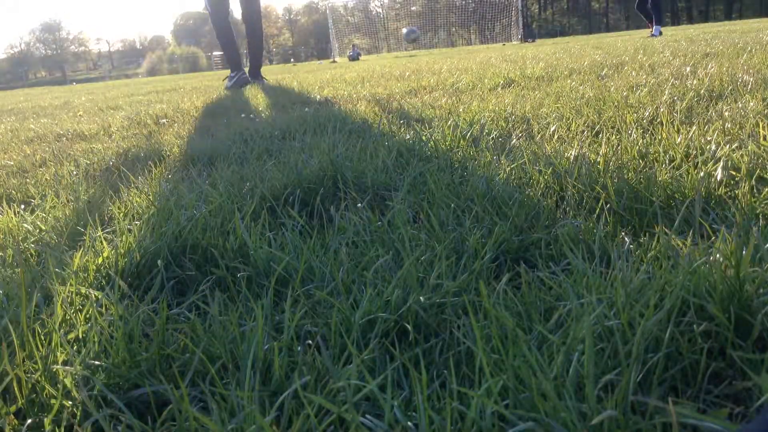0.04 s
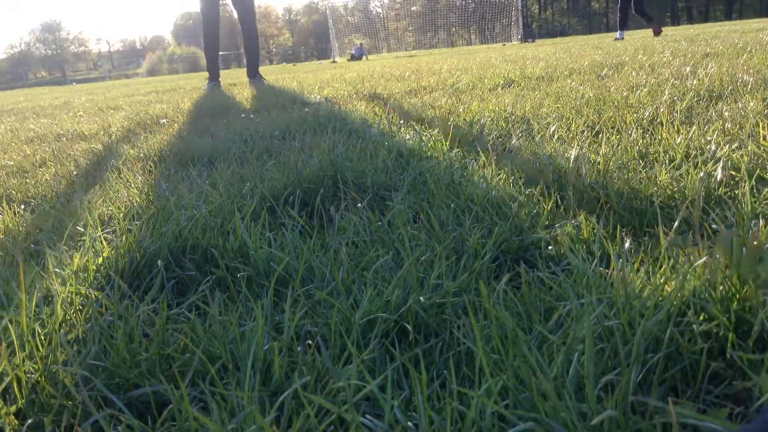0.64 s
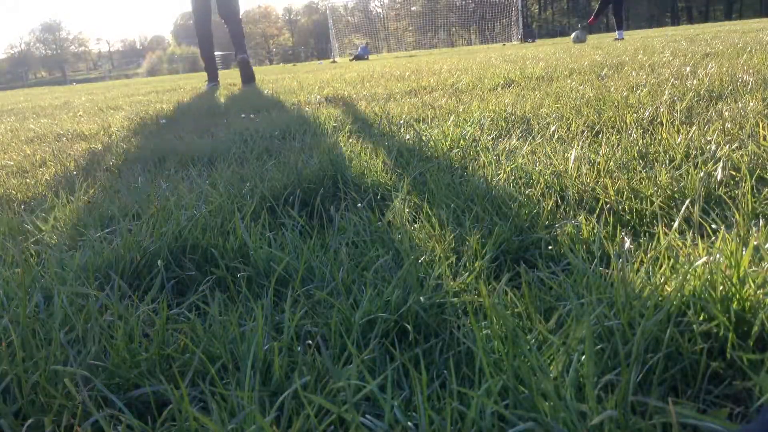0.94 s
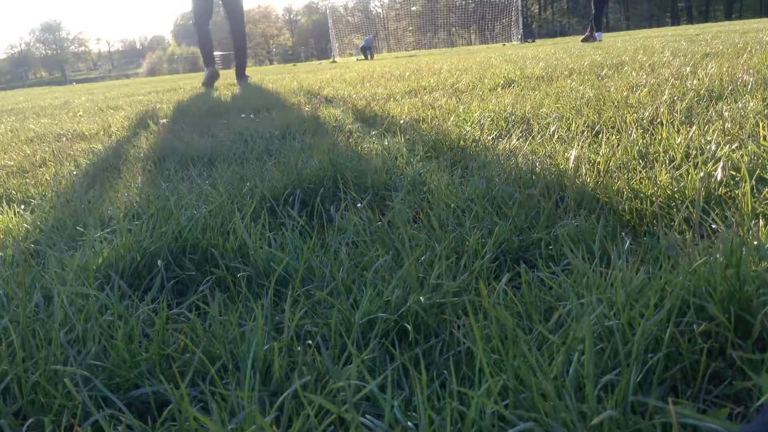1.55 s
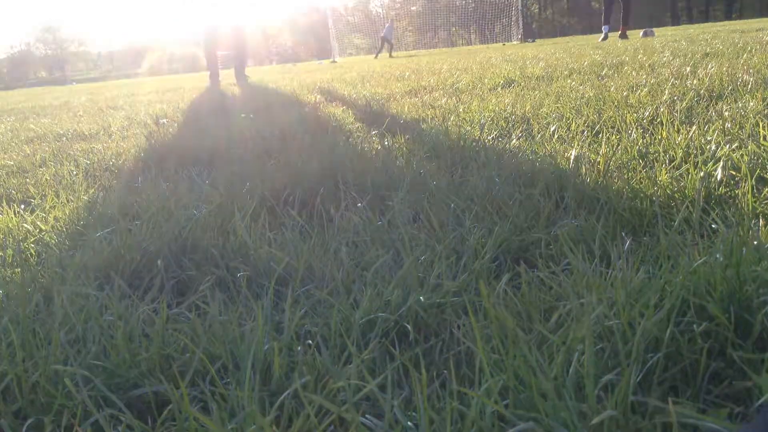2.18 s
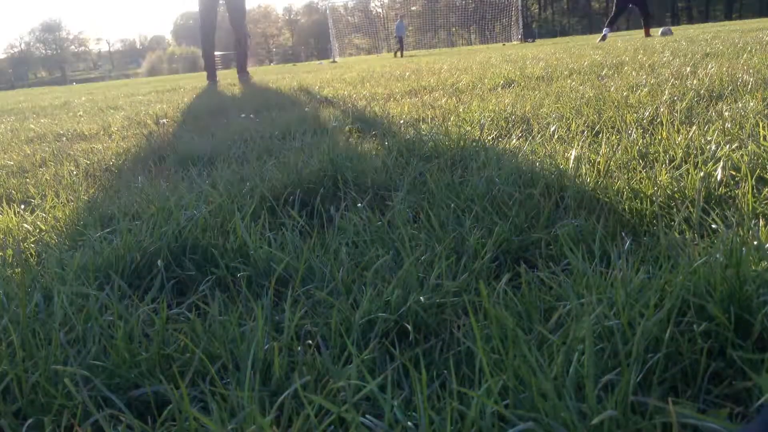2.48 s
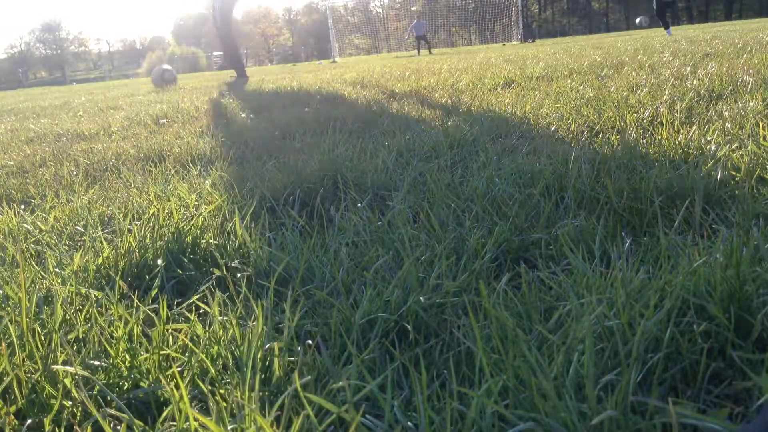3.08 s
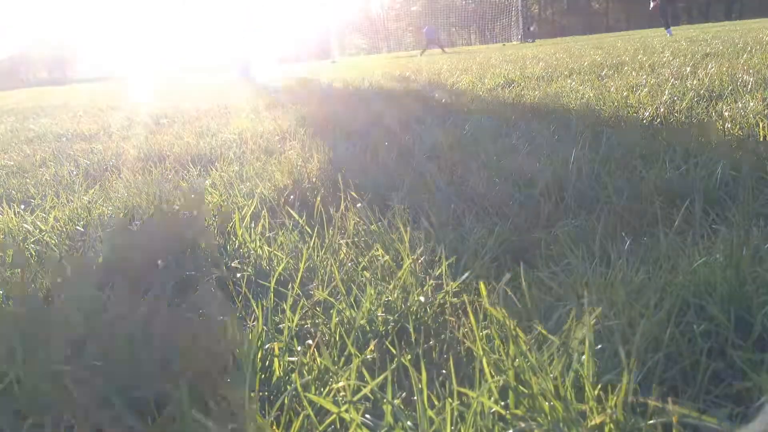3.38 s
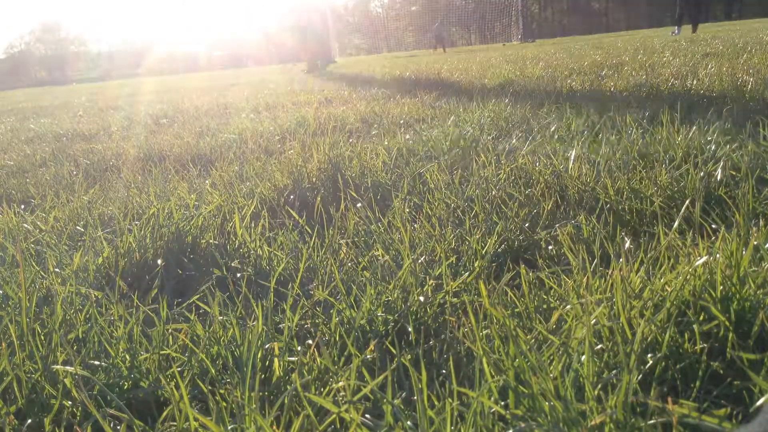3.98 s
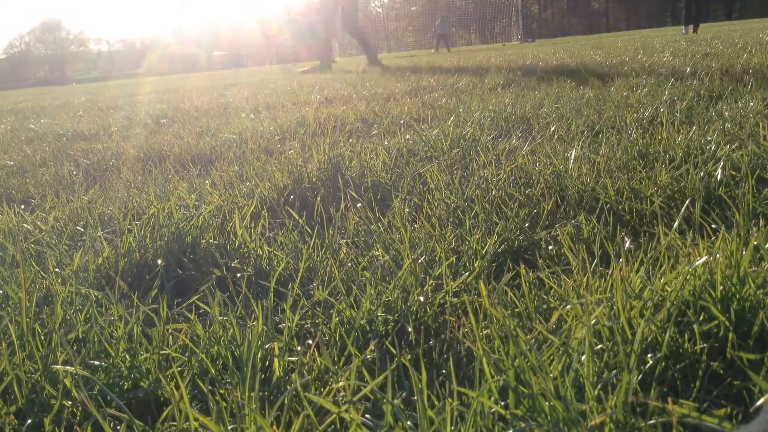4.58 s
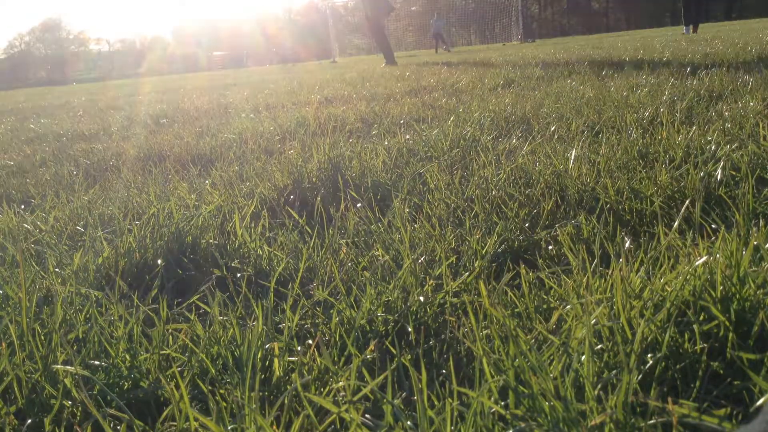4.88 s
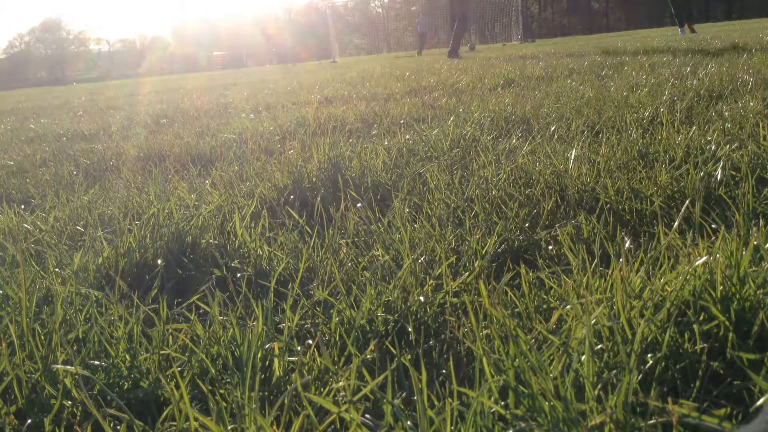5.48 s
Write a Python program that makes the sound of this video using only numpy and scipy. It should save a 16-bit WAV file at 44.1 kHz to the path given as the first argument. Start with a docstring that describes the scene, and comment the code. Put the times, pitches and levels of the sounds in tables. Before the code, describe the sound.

A faint, dull wash of distant traffic runs throughout, heard from low in the grass of an open field. A far motorbike rises slightly in pitch and fades by about 1.3 seconds. Small birds give thin, quiet whistles and chirps until about 3.6 seconds. A football is kicked with a soft thud at 0.2 seconds, faintly near 1.1, more firmly at 1.9 with a soft step on turf, and lightly at 2.5. At 3.1 seconds comes the loudest sound, a hard, close kick with a sharp slap and a short hollow ring, followed at once by a second thud. A faint echo returns from the trees about half a second later. Smaller, farther kicks land at about 3.7, 4.1, 4.8, 5.1 and 5.5 seconds. Grass blades flick the microphone with a tiny crackle at 3.3, a sharp snap at 4.3 and a softer tap at 5 seconds.

```python
"""Distant traffic, a motorbike pulling away and a few small birds, heard from the grass of an open field.
Footballs are kicked about, one hard and near, the others farther off: the boot slaps the skin,
the ball flexes and the air inside rings. The turf soaks up their treble and the tree line echoes them.
Boots press into the turf, and grass blades flick the microphone's case."""
import sys
import numpy as np
from scipy import signal
from scipy.fft import rfft, irfft
from scipy.io import wavfile
from scipy.ndimage import uniform_filter1d

SR = 44100
rng = np.random.default_rng(int(sys.argv[2]) if len(sys.argv) > 2 else 0)


def put_to_file(sound):
    """Save the sound as 16-bit audio at rate SR, in the file named by the first command-line argument."""
    columns = np.atleast_2d(sound).T  # one column per channel
    safe = np.clip(columns, -1, 1)
    whole_steps = np.round(safe * 32767)
    wavfile.write(sys.argv[1], SR, whole_steps.astype(np.int16))


N = 244314
TIME = np.arange(N) / SR
BLOW = np.arange(4096) / SR  # time axis of one impact [s]


def gain_of(db):
    """Decibels to amplitude."""
    return 10 ** (np.asarray(db) / 20)


def unit_rms(x):
    """Scales to rms 1."""
    return x / np.sqrt(np.mean(x ** 2) + 1e-20)


def unit_peak(x):
    """Scales to peak 1."""
    return x / (abs(x).max() + 1e-20)


def bins(x):
    """FFT bin frequencies of x [Hz]."""
    return np.fft.rfftfreq(len(x), 1 / SR)


def curve_db(points, hz):
    """Interpolates a spectrum over log frequency."""
    point_hz, db = np.transpose(points)
    return np.interp(np.log(hz + 1), np.log(point_hz + 1), db)


def delayed(x, delay_s):
    """Fractional delay, same length."""
    t = np.arange(len(x)) / SR
    return np.interp(t - delay_s, t, x, left=0)


def add(mix, time_s, sound):
    """Mixes a sound in at time_s."""
    part = mix[max(round(time_s * SR), 0):][:len(sound)]
    part += sound[:len(part)]


def play(rows, source, lead_s=0):
    """Sounds each row of an event table, starting lead_s early."""
    out = np.zeros(N)
    for time_s, *controls in rows:
        add(out, time_s - lead_s, source(*controls))
    return out


def noise(spectrum_db, t):
    """Shaped noise of rms 1, as long as t."""
    return unit_rms(irfft(rfft(rng.standard_normal(len(t))) * gain_of(spectrum_db), len(t)))


def drift(t, rate_hz):
    """Random wander of rms 1, rolled off above rate_hz."""
    return noise(-10 * np.log10(1 + (bins(t) / rate_hz) ** 4), t)


def click(spectrum_db):
    """Minimum-phase pulse with this spectrum."""
    log_gain = np.log(gain_of(np.maximum(spectrum_db, -100)))
    mirrored = np.concatenate([log_gain, log_gain[-2:0:-1]])
    return np.fft.ifft(np.exp(np.conj(signal.hilbert(mirrored)))).real


def thump(hz, swell_s):
    """Heavily damped swing that builds and dies in a couple of cycles."""
    age = BLOW / swell_s
    return unit_peak(age * np.exp(-age) * np.sin(2 * np.pi * hz * BLOW))


def ring(modes, scale=1):
    """Struck modes dying away."""
    return sum(gain_of(db - 60 * BLOW / t60_s) * np.sin(2 * np.pi * hz * scale * BLOW)
               for hz, db, t60_s in modes)


def scatter(x, t60_s):
    """Trunks and branches smear a sound into a dying tail."""
    t = np.arange(SR) / SR
    tail = rng.standard_normal(SR) * gain_of(-60 * t / t60_s)
    return signal.fftconvolve(x, tail / np.linalg.norm(tail))[:N]


# far traffic spectrum: (frequency [Hz], relative density [dB])
TRAFFIC_SPECTRUM = [(30, -0.5), (65, -19), (85, -14.5), (110, -8.5), (170, -1), (240, 1.5), (410, -3),
                    (650, -7.5), (880, -5.5), (1110, -11.5), (1600, -27.5), (2100, -35), (2600, -48),
                    (4000, -71)]


def traffic(level_db=-52, patchy_db=1.28, swell_db=1.5, swell_at_s=0.7, swell_s=0.97):
    """Dull far-off wash with drifting patches and one gentle swell."""
    frames = signal.stft(rng.standard_normal(N), nperseg=2048, noverlap=1536)[2]
    patches = uniform_filter1d(rng.standard_normal(frames.shape), size=10, axis=0)
    patches = unit_rms(uniform_filter1d(patches, size=10, axis=1))
    patchy = signal.istft(frames * gain_of(patchy_db * patches), nperseg=2048, noverlap=1536)[1][:N]
    wash = unit_rms(irfft(rfft(patchy) * gain_of(curve_db(TRAFFIC_SPECTRUM, bins(TIME))), N))
    swell = np.exp(-((TIME - swell_at_s) / swell_s) ** 2)
    return wash * gain_of(level_db + swell_db * swell)


# noise floor spectrum: (frequency [Hz], relative density [dB])
HISS_SPECTRUM = [(1200, -7), (2000, -2), (3000, -2.5), (4500, -2.5), (7300, -3.5), (14100, -5),
                 (15300, -7.5)]


def hiss(level_db=-70):
    """Faint, steady broadband floor."""
    return gain_of(level_db) * noise(curve_db(HISS_SPECTRUM, bins(TIME)), TIME)


# firing tone envelope, before fade and flutter: (time [s], rms level [dB])
FIRING_LEVEL = [(0.0, -60), (0.17, -47), (0.36, -54.5), (0.92, -53.5), (1.05, -69)]


def motorbike(start_hz=233.1, top_hz=262, rev_s=0.88, gone_s=1.35, fade_s=0.36, flutter_db=1.8):
    """Two engine orders climb as the bike pulls away, waver in moving air and fade."""
    firing_hz = start_hz + (top_hz - start_hz) * np.sin(np.pi / 2 * np.minimum(TIME / rev_s, 1)) ** 2
    phase = 2 * np.pi * np.cumsum(firing_hz * (1 + 0.0095 * drift(TIME, rate_hz=20))) / SR
    firing = gain_of(np.interp(TIME, *np.transpose(FIRING_LEVEL))) * np.sin(phase)
    overtone = gain_of(-60.5) * np.sin(2 * phase)
    fade = np.clip((gone_s - TIME) / fade_s, 0, 1)
    flutter = gain_of(flutter_db * (drift(TIME, rate_hz=4.8) + 0.76 * drift(TIME, rate_hz=32)))
    return np.sqrt(2) * (firing + overtone) * fade * flutter


# single bird calls: (time [s], length [s], pitch [Hz], source level [dB], rasp [fraction of pitch])
BIRD_CALLS = [(0.09, .32, 4444, -77, 0.011), (0.49, 0.12, 4490, -79, 0.009), (0.81, 0.063, 3220, -74, 0.01),
              (1.255, 0.12, 4630, -70.5, .075), (2.12, 0.034, 5670, -66, 0.022),
              (2.36, 0.24, 4070, -78, .029), (2.98, 0.61, 4660, -76, 0.0188),
              (3.015, 0.027, 4500, -62.5, 0.034)]


def bird_note(length_s, pitch_hz, db, rasp, fall=0):
    """Thin whistle, level or falling; fast pitch flutter makes it raspy."""
    t = np.arange(SR) / SR
    glide_hz = pitch_hz * np.interp(t, [0, length_s], [1, 1 - fall])
    hz = glide_hz * (1 + rasp * drift(t, rate_hz=210))
    swell = np.sqrt(np.sin(np.pi * np.minimum(t / length_s, 1)).clip(0))
    return gain_of(db) * swell * np.sin(2 * np.pi * np.cumsum(hz) / SR)


HARD_SLAP_DB, SWISH_S = -10, 0.006
# boot on ball skin: (frequency [Hz], relative level [dB])
SLAP_SPECTRUM = [(40, -48), (100, 1), (200, -8.5), (330, 5.5), (600, -0.5), (1000, -8.5), (2000, -5),
                 (5000, -16.5)]
# air inside the ball: (frequency [Hz], relative level [dB], t60 [s])
BALL_AIR_MODES = [(874, -6, 0.031), (990, -4, 0.038), (1390, -55, 0.006), (1620, -30, .025)]
# contact crackle of kicks and grass: (frequency [Hz], relative density [dB])
CRACKLE_SPECTRUM = [(1000, -18), (2200, -21), (4500, -1), (7000, 3), (10000, 1), (13000, 5), (16000, -1)]
# blows on a ball: (time [s], slap [dB], treble edge [Hz], thump [dB], thump pitch [Hz],
# air ring gain [dB], contact time [s])
KICKS = [(0.2185, -35, 1980, -34.5, 150, -30, 0.0095), (1.043, -67, 1820, -47, 187, -46, .008),
         (1.091, -49, 1760, -48, 187, -50, 0.0066), (1.9109, -26, 1330, -31, 146, -56, .0125),
         (2.4656, -43.5, 850, -40, 225, -43, .008), (3.1224, -10.5, 1310, -19, 170.5, -31, .0123),
         (3.1762, -21.5, 2010, -23, 171, -27.5, .0092), (3.6953, -37.5, 1330, -41, 261, -36.5, .003),
         (4.1335, -34, 1270, -38, 232, -70, 0.00255), (4.7578, -43, 1150, -34.5, 207, -41, .002),
         (5.1218, -45.5, 1310, -47, 213, -42, 0.0061), (5.4792, -37, 1410, -34.5, 245, -60, 0.0059)]


def kick(slap_db, edge_hz, thump_db, thump_hz, ring_db, contact_s):
    """The boot swishes in and slaps the skin; the ball flexes, then snaps back with its air ringing."""
    hz, force_db = bins(BLOW), slap_db - HARD_SLAP_DB
    turf_db = 10 * np.log10(1 / (1 + (hz / edge_hz) ** 20) + 1e-5)  # turf absorbs the treble
    slap = gain_of(slap_db) * unit_peak(click(curve_db(SLAP_SPECTRUM, hz) + turf_db))
    air = gain_of(ring_db) * signal.fftconvolve(ring(BALL_AIR_MODES), click(turf_db))[:len(BLOW)]
    contact = slap + air
    rebound = gain_of(-7) * delayed(contact, contact_s)
    second_mode = gain_of(2 + 0.4 * force_db) * thump(2.15 * thump_hz, swell_s=0.0021)
    flex = gain_of(thump_db) * (thump(thump_hz, swell_s=0.0031) + second_mode)
    rub = noise(turf_db - 10 * np.log10(1 + (450 / (hz + 1)) ** 2), BLOW)  # little bass
    scuff_envelope = np.exp(-BLOW / 0.011) * (1 - np.exp(-BLOW / 0.0031))
    scuff = gain_of(-31 + 0.99 * force_db) * rub * scuff_envelope
    crackle_gain = gain_of(slap_db - 38) * (edge_hz / 1300) ** 2  # more from brighter blows
    crackle = crackle_gain * noise(curve_db(CRACKLE_SPECTRUM, hz), BLOW) * np.exp(-BLOW / 0.0037)
    swish_envelope = np.sin(np.pi * np.minimum(BLOW / (2 * SWISH_S), 1)) ** 2
    swish = gain_of(-42.5 + 0.26 * force_db) * rub[::-1] * swish_envelope
    return swish + delayed(contact + rebound + flex + scuff + crackle, SWISH_S)


def tree_line_echo(x, delay_s=0.464):
    """Late, slightly smeared reflection off the trees."""
    return gain_of(-28) * delayed(scatter(x, t60_s=0.08), delay_s)


# boots pressing into turf: (time [s], level [dB])
STEPS = [(1.905, -45), (3.592, -54)]


def step(db, edge_hz=1200, swell_s=0.018):
    """Grass crushed under a boot: a dull puff that swells and dies."""
    crush = noise(-10 * np.log10(1 + (bins(BLOW) / edge_hz) ** 10), BLOW)
    return gain_of(db) * crush * np.exp(-abs(BLOW - BLOW.mean()) / swell_s)


# chirp runs: (start [s], end [s], period [s], pitch [Hz], source level [dB])
BIRD_TRILLS = [(2.34, 2.5, .105, 6360, -69), (2.597, 2.95, .101, 6500, -70), (3.03, 3.07, .1, 3740, -67),
               (3.135, 3.44, .055, 4160, -69)]


def bird_trills(chirp_s=0.0272, pitch_spread=0.02):
    """A bird repeats one falling chirp at an even pace, never quite on the same pitch."""
    out = np.zeros(N)
    for start_s, end_s, period_s, pitch_hz, db in BIRD_TRILLS:
        for time_s in np.arange(start_s, end_s, period_s):
            chirp_hz = pitch_hz * (1 + pitch_spread * rng.standard_normal())
            add(out, time_s, bird_note(chirp_s, chirp_hz, db, rasp=0.035, fall=0.1))
    return out


SHARP_SNAP_DB, HEAVY_THUMP_DB = -22, -27.5
# blade striking the case: (frequency [Hz], relative level [dB])
SNAP_SPECTRUM = [(200, -5.5), (800, 17), (1900, -22), (3200, -0.5), (4000, -5), (7000, -5), (11000, -38),
                 (15000, -22)]
# grass blade modes: (frequency [multiple of blade pitch], relative level [dB], t60 [s])
BLADE_MODES = [(1, 4.5, 0.0075), (1.48, -10.5, 0.013), (1.85, -19, .01)]
# grass on the microphone: (time [s], snap drive [dB], blade pitch [Hz], crackle [dB], case thump [dB])
GRASS_FLICKS = [(3.2787, -58, 9200, -38, -60.5), (4.2918, -24.5, 3230, -46.5, -31),
                (4.9802, -43.5, 6860, -51, -33)]


def grass_flick(snap_db, blade_hz, crackle_db, thump_db):
    """A blade snaps against the microphone's case, sets it thudding and brushes it springing back."""
    hz, bend_db = bins(BLOW), 0.33 * (snap_db - SHARP_SNAP_DB)
    snap = gain_of(snap_db) * unit_peak(click(curve_db(SNAP_SPECTRUM, hz)))
    contact = snap + gain_of(-39.5 + bend_db) * ring(BLADE_MODES, blade_hz)
    chatter = gain_of(0.5) * contact + gain_of(-8.5) * delayed(contact, 0.00085)
    scrape_envelope = np.exp(-BLOW / 0.0046) + gain_of(-31) * np.exp(-BLOW / 0.02)
    crackle = gain_of(crackle_db) * noise(curve_db(CRACKLE_SPECTRUM, hz), BLOW) * scrape_envelope
    brush_envelope = np.exp(-((BLOW - 0.015) / 0.0044) ** 2) + gain_of(-7) * np.exp(-BLOW / 0.043)
    brush = noise(-10 * abs(np.log2((hz + 1) / (1.55 * blade_hz))), BLOW)
    spring_back = gain_of(-58 + bend_db) * brush * brush_envelope
    knock = gain_of(-30 + 0.18 * (thump_db - HEAVY_THUMP_DB)) * thump(hz=730, swell_s=0.0004)
    case = gain_of(thump_db) * thump(hz=201, swell_s=0.0032) - knock
    return chatter + crackle + spring_back + case


def scene():
    """Mono mix of background, birds, kicks with their echoes, steps and grass."""
    background = traffic() + hiss() + motorbike()
    song = play(BIRD_CALLS, bird_note) + bird_trills()
    birds = gain_of(-1) * song + gain_of(-1.5) * scatter(song, t60_s=0.57)
    kicks = play(KICKS, kick, lead_s=SWISH_S)
    echoes = gain_of(-18) * scatter(kicks, t60_s=0.25) + tree_line_echo(kicks)
    steps = play(STEPS, step, lead_s=BLOW.mean())
    grass = play(GRASS_FLICKS, grass_flick)
    return (background + birds + kicks + echoes + steps + grass)[None]


def record(dry):
    """The microphone's 85 Hz bass cut, then a 15350 Hz band limit."""
    bass_cut = signal.butter(4, 85, "highpass", fs=SR, output="sos")
    band_limit = signal.firwin(511, 15350, window=("kaiser", 9), fs=SR)
    return signal.oaconvolve(signal.sosfilt(bass_cut, dry), band_limit[None], "same")


dry = scene()
out = record(dry)
put_to_file(out)
```